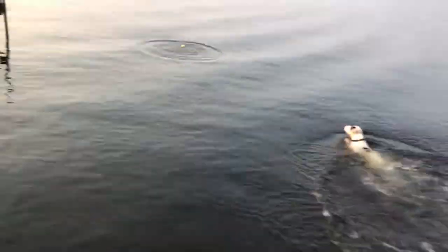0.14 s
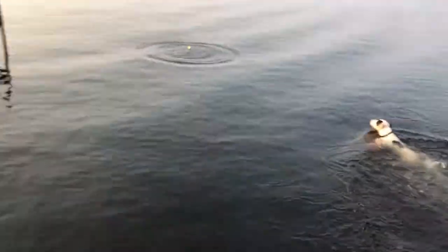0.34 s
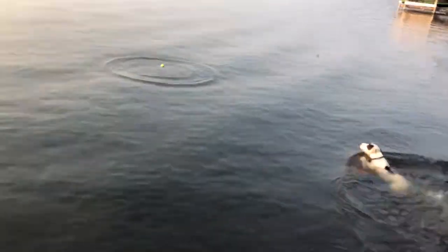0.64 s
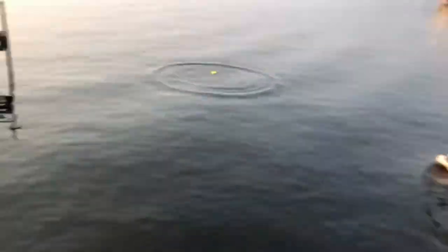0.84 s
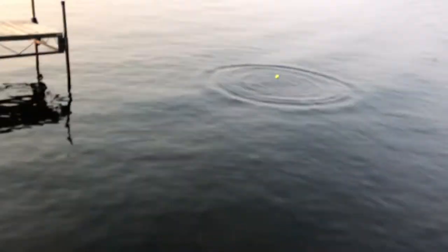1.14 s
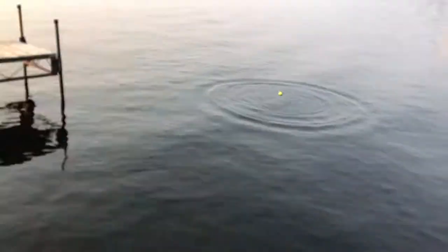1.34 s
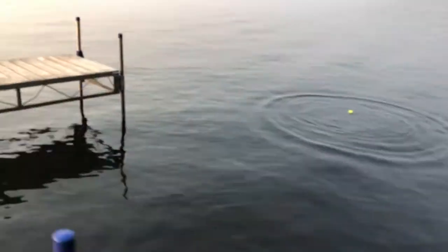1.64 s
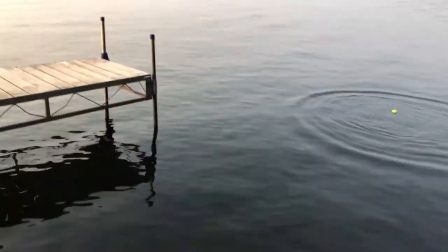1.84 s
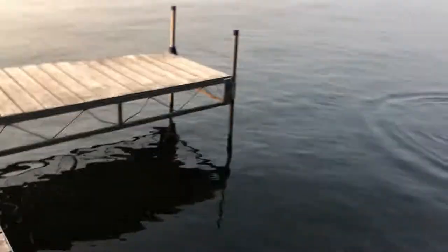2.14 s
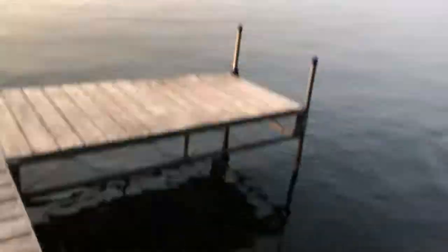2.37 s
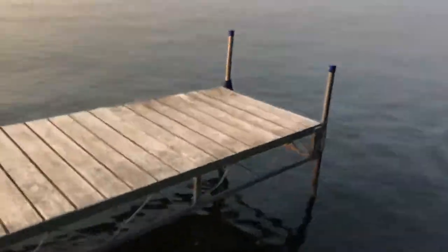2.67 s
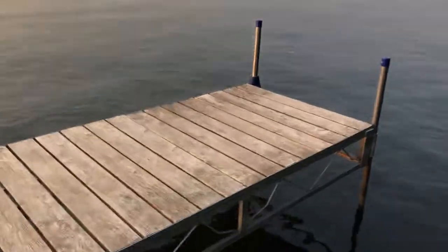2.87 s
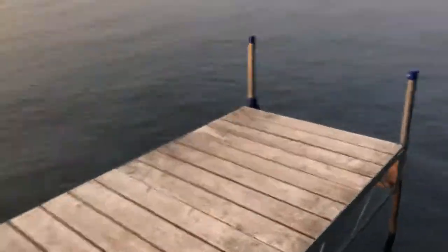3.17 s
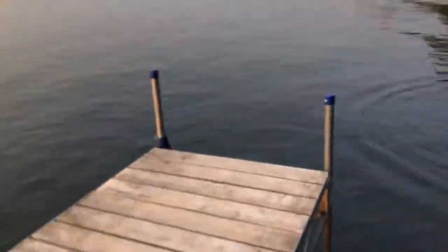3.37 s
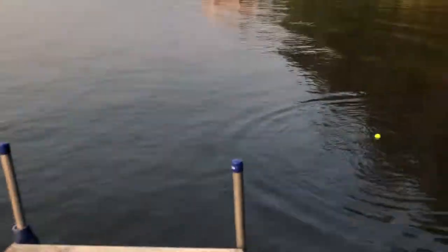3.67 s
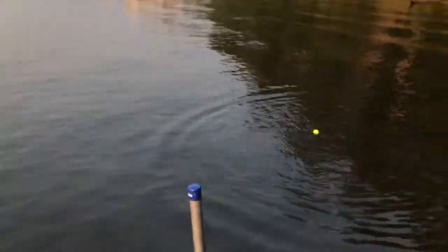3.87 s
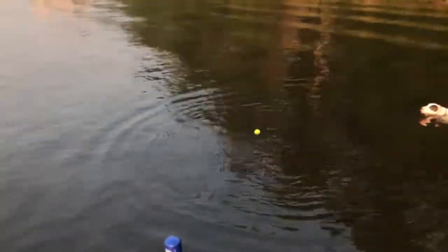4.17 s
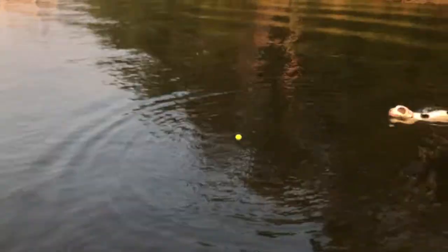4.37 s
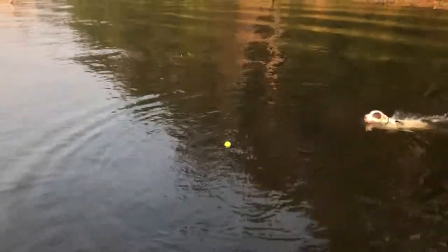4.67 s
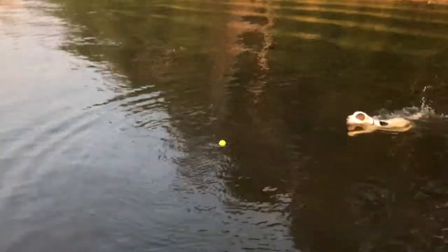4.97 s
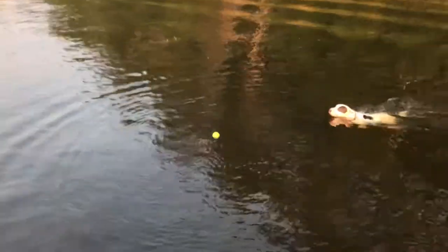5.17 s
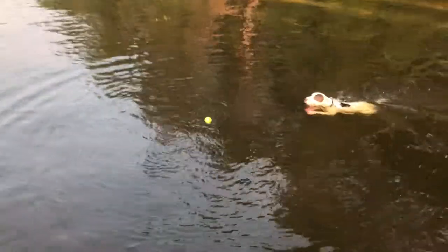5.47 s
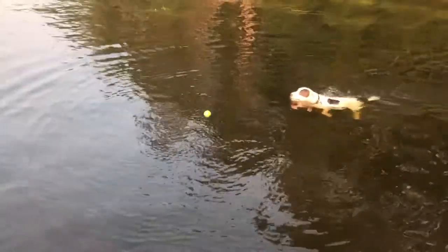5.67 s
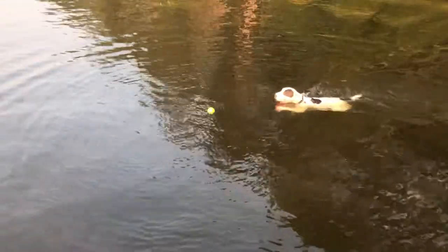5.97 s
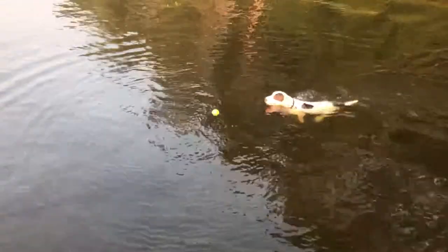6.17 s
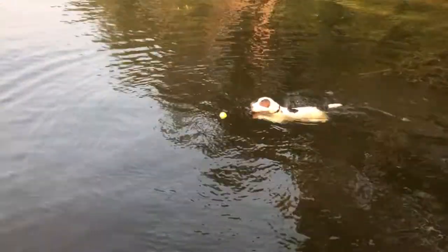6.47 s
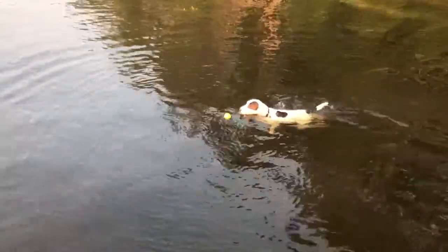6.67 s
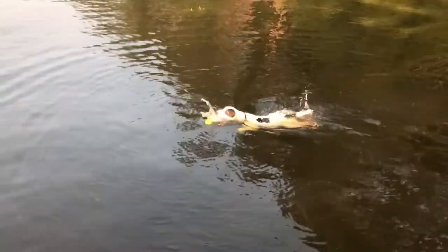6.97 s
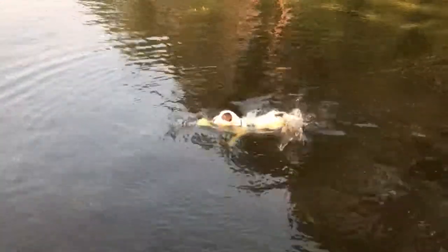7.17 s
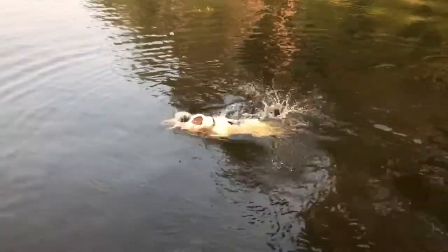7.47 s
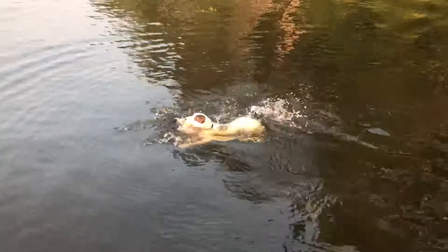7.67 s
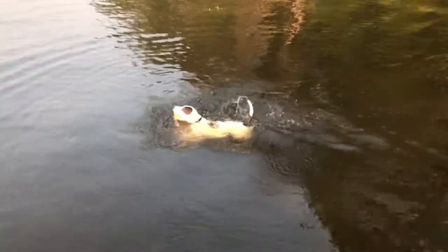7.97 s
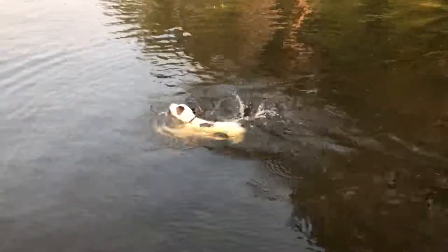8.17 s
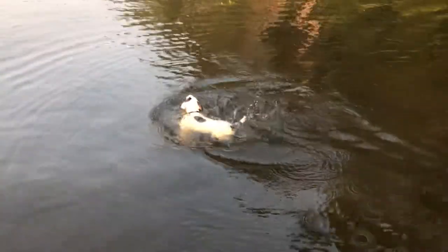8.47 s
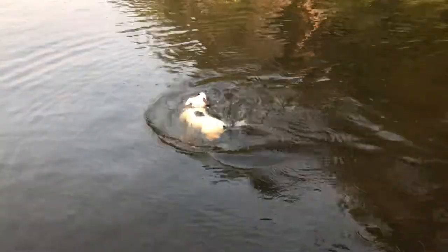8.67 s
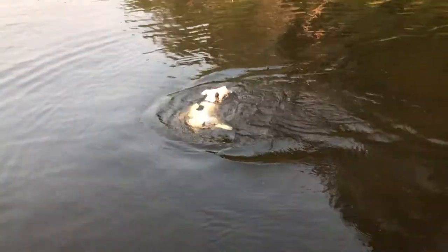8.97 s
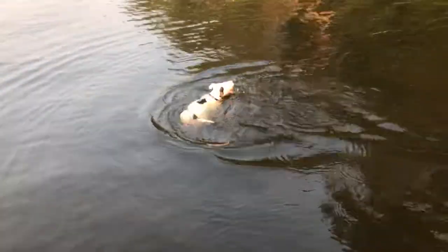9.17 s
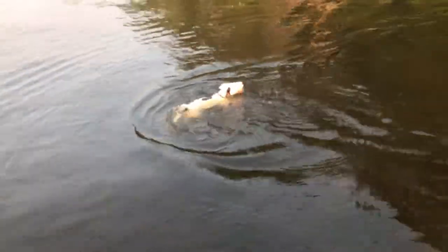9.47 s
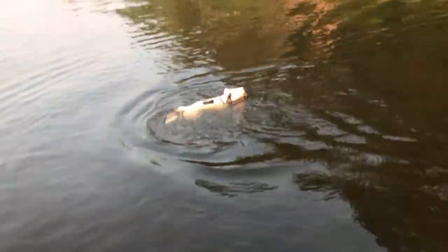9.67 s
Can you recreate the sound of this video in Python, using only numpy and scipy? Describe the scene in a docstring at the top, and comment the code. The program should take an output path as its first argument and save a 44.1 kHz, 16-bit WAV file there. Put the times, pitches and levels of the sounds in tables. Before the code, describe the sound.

Open lakeside, close handheld microphone. From 0 to about 3.8 seconds someone jogs on a plank dock, roughly three steps a second: hard, hollow wooden knocks with slaps, double hits and loose-board chatter, over a low rumble that keeps shaking between steps. A short rising squeak comes near 1.4, sharp ticks near 1.55, and an especially strong crack at 2.8. Steps weaken, with a lighter knock at 4.2 and a faint last one at 5.3. Underneath lie a soft, low lake hush and a faint distant motor hum. From 4.3 a dog's paddling emerges: a small splash at 4.4, a plop at 4.9, a soft swash at 5.8. At 6.8 to 7.7 comes the liveliest splashing, bubbly and bright with crisp spray, sharpest around 7.5. It thins to drips and light flicks by 8.2, then gentle gurgles and quiet strokes until the end near 9.8.

```python
"""On a quiet lake, someone jogs along a plank dock, which knocks, rattles and rumbles, then stands still.
Knocks are filtered noise with ringing modes; the shaken dock is swells of coloured noise and small rings.
A dog swims nearby: wash and spray are lumpy noise, bubbles and drops are damped sines or short clicks.
A far motor, a fuzzy low tone with a cleaner one about an octave up, hums over the hush of the lake."""
import sys
import numpy as np
from scipy import signal
from scipy.fft import rfft, irfft, next_fast_len
from scipy.io import wavfile
from scipy.ndimage import map_coordinates

SR = 44100
rng = np.random.default_rng(int(sys.argv[2]) if len(sys.argv) > 2 else 0)


def put_to_file(sound):
    """Save the sound as 16-bit audio at rate SR, in the file named by the first command-line argument."""
    columns = np.atleast_2d(sound).T  # one column per channel
    safe = np.clip(columns, -1, 1)
    whole_steps = np.round(safe * 32767)
    wavfile.write(sys.argv[1], SR, whole_steps.astype(np.int16))


N = 433503

# Resonances of the planks. Each row: centre in Hz, width in Hz, level in dB.
PLANK_MODES = [(91, 74, -2), (235, 51.7, 3.5), (368, 57, 3.5), (625.5, 56, -1.5), (857, 220, -13)]
# Spectrum of spray and hiss. Each row: frequency in Hz, relative density in dB per Hz.
SPRAY_SPECTRUM = [(1760, -5), (3000, -2.5), (4540, -8), (6620, -6.5), (13200, -10), (16000, -15)]
# Footfalls that set the whole dock shaking. Each row: start in seconds, rumble t60 in seconds,
# rumble level in dB, rattle level in dB, hiss level in dB, note of the board underfoot in Hz.
FOOTFALLS = [(-0.05, 1.56, -34.5, -47, -72.5, 194), (0.387, 2.3, -34, -54, -61, 172),
             (0.744, 0.91, -30.5, -48, -63, 186), (1.09, 1.4, -31, -45, -57, 183),
             (1.4, 0.94, -33, -45, -55, 121), (1.784, 1.7, -37, -53.5, -63, 150),
             (2.042, 1.03, -36.5, -53, -51, 178), (2.44, 2.4, -37, -50.5, -65, 175),
             (2.819, 1.47, -29.5, -43, -50, 143), (3.13, 2.58, -38.5, -51.5, -60.5, 183),
             (3.245, 0.76, -35.5, -62, -74, 140), (3.659, 1.08, -38, -47.5, -67, 153),
             (4.079, 1.24, -48, -54.5, -65, 159), (4.191, 1.1, -44.5, -55.5, -60.5, 159),
             (4.659, 1.34, -49.5, -60, -80, 178), (5.271, 0.41, -57, -68.5, -63, 125)]


def amp(db):
    """Decibel law: amplitude gain is ten to the power of level over 20."""
    return 10 ** (np.asarray(db) / 20)


def unit(x):
    """Normalisation by signal power: x scaled to rms 1."""
    return x / np.sqrt(np.mean(x ** 2) + 1e-20)


def along(points, hz):
    """Interpolation on a logarithmic frequency axis through (Hz, value) points."""
    f, v = np.transpose(points)
    return np.interp(np.log(hz + 1), np.log(f + 1), v)


def gains(rows):
    """Envelopes linear in dB: one gain per sample for each dB column, -120 dB outside the table."""
    seconds, *columns_db = np.vstack(rows).T
    t = np.arange(N) / SR
    return [amp(np.interp(t, seconds, db, -120, -120)) for db in columns_db]


def wobble(rate):
    """Slow random modulation: a smooth curve through random knots, rate of them a second."""
    knots = rng.standard_normal(int(N * rate / SR) + 4)
    return map_coordinates(knots, [np.arange(N) * rate / SR])


def filtered(x, response):
    """Linear filtering: the spectrum of x times a complex response of frequency."""
    m = next_fast_len(len(x) + 8192)
    return irfft(rfft(x, m) * response(np.fft.rfftfreq(m, 1 / SR)), m)[:len(x)]


def grains(s, gain, hz, cycles, rise):
    """Damped oscillation: soft-started sines whose pitch climbs by the share rise over a life in cycles."""
    rows = np.column_stack(np.broadcast_arrays(s, gain, hz, np.clip(cycles, .3, 60), rise))
    out = np.zeros(N + SR)
    by_length = rows[np.argsort(rows[:, 3] / rows[:, 2])]
    # grains of similar length are computed together
    for group in np.array_split(by_length, min(6, len(rows))):
        s, gain, hz, cycles, rise = group.T[:, :, None]
        t = np.arange(int(3.5 * SR * np.max(cycles / hz)))[None] / SR
        age = t * hz / cycles  # in lives
        turns = hz * t * (1 + rise * (age - 1) / 2)  # the given pitch is reached halfway through the life
        envelope = np.exp(-age - age ** 2 / 7) * (1 - np.exp(-8 * age))
        wave = gain * np.sin(2 * np.pi * turns) * envelope
        at = (s * SR).astype(int) + np.arange(t.size)
        out += np.bincount(at.ravel(), wave.ravel(), N + SR)
    return out[:N]


def scatter(level, count, low_hz, span, cycles, spread_db, rise):
    """Superposition of small random rings whose size follows a level curve."""
    draw = rng.random((count, 4))
    sounding = np.flatnonzero(level > 1e-5)
    at = sounding[(draw[:, 0] * len(sounding)).astype(int)]
    size = level[at] * amp(spread_db * draw[:, 1] ** 2)
    pitch_hz = low_hz * span ** draw[:, 2]
    return grains(at / SR, size, pitch_hz, cycles * (0.5 + draw[:, 3]), rise)


def bursts(peak_s, db, rise_s, t60_s):
    """Addition of powers: overlapping swells each rise smoothly to a peak, then decay exponentially."""
    # the gain is computed every 64 samples
    t = np.arange(0, N + 64, 64) / SR - np.reshape(peak_s, (-1, 1))
    rise_s, t60_s, db = (np.reshape(v, (-1, 1)) for v in (rise_s, t60_s, db))
    rising = np.sin(np.pi / 2 * np.clip(1 + t / rise_s, 0, 1)) ** 2
    power = (rising * amp(db - 60 * np.maximum(t, 0) / t60_s)) ** 2
    return np.interp(np.arange(N) / 64, np.arange(t.shape[1]), np.sqrt(power.sum(0)))


def rush(spectrum, lumpy_db, lump_hz, spike):
    """Shaped noise of rms 1: random lumps and sparse spikes, coloured by a spectrum."""
    spikes = rng.standard_normal(N) * rng.exponential(size=N) ** spike
    lumps = amp(lumpy_db * wobble(lump_hz))
    return unit(filtered(spikes * lumps, lambda hz: amp(along(spectrum, hz))))


def planks(f, modes):
    """Modal response: a sum of damped resonances of boards, alternating in sign."""
    total = 0
    for k, (centre, width, db) in enumerate(sorted(modes)):
        damping = 1j * f * width
        total = total + (-1) ** k * amp(db) * damping / (centre * centre - f * f + damping)
    return total


def underfoot(s):
    """Local resonance: note in Hz of the board that the last footfall landed on."""
    start, *_, note_hz = np.transpose(FOOTFALLS)
    return note_hz[np.clip(np.searchsorted(start - .02, s) - 1, 0, None)]


def lake_hush():
    """Broadband ambient noise: a soft spectrum under a slowly changing level."""
    # Each row: frequency in Hz, relative density in dB per Hz.
    quiet_spectrum = [(15, -69), (30, 8), (55, 1), (137, 2), (190, -2.5), (293, -8.5), (575, -13.5),
                      (734, -12.5), (1040, -15), (3080, -22.5), (3520, -22.5), (14800, -40), (16000, -38)]
    # Each row: time in seconds, level in dB.
    hush_levels = [(0, -50.5), (3.3, -55), (3.58, -56), (3.75, -52.5), (5, -53.5), (5.95, -54),
                   (6.5, -55.5), (9.83, -53.5)]
    return gains(hush_levels)[0] * rush(quiet_spectrum, lumpy_db=2.5, lump_hz=6, spike=0.31)


def far_motor():
    """Narrow-band noise and frequency modulation: a fuzzy low tone and a wavering one about an octave up."""
    # The second tone comes and goes. Each row: time in seconds, level in dB.
    overtone_levels = [(0, -47), (5.3, -63), (5.5, -58), (6.6, -61.5), (6.8, -72), (8.0, -79), (8.2, -56.5),
                       (8.7, -61.5), (9.83, -59)]
    motor_hz, motor_db = 66.9, -58.5
    noise = rng.standard_normal(N)
    fuzzy = unit(filtered(noise, lambda f: 1 / (1 + ((f - motor_hz) / 5) ** 2)))
    overtone_hz = 2.05 * motor_hz + 1.12 * wobble(3)
    clean = unit(np.sin(2 * np.pi * np.cumsum(overtone_hz) / SR)) * amp(0.25 * wobble(3.1))
    return amp(motor_db) * fuzzy + gains(overtone_levels)[0] * clean


def water():
    """Addition of powers: gains of gurgle, wash and spray join unsteady churning and single splashes."""
    # How hard the dog churns the water. Each row: time in seconds, gurgle, wash and spray levels in dB.
    churn_levels = [(4.3, -61, -72, -75), (4.8, -58, -54, -58), (4.97, -59, -64, -66), (5.3, -57, -61, -66),
                    (5.55, -60.5, -59, -62), (5.95, -68, -79, -75), (6.2, -57, -62, -64),
                    (6.45, -59.5, -59.5, -68), (6.78, -61, -65, -68), (7.02, -59, -60, -66),
                    (7.1, -49.5, -54.5, -55), (7.25, -49, -49.5, -51.5), (7.4, -51.5, -53, -55),
                    (7.62, -49, -53, -52.5), (7.92, -57, -52, -54.5), (8.1, -63, -62, -64.5),
                    (8.5, -59, -61.5, -63.5), (8.88, -55, -55.5, -66), (9.15, -61, -67.5, -65),
                    (9.83, -59.5, -62, -77)]
    # Single splashes. Each row: gurgle peak in seconds, swell in seconds, fall t60 in seconds,
    # gurgle, wash and spray levels in dB.
    splashes = [(4.374, 0.051, 0.32, -46.5, -46, -47.5), (4.45, 0.048, 0.15, -54, -50, -50.5),
                (4.892, 0.0079, 0.056, -53, -44.5, -61), (5.684, 0.13, 0.11, -53.5, -61, -66),
                (5.786, 0.091, 0.29, -46, -43.5, -51.5), (5.846, 0.034, 0.18, -50, -46.5, -57),
                (6.06, 0.025, 0.2, -51.5, -62, -76), (6.827, 0.026, 0.052, -43, -43.5, -47),
                (6.9, 0.03, 0.32, -48.5, -49, -46.5), (7.469, 0.0089, 0.56, -49.5, -48, -45.5),
                (7.585, 0.008, 0.04, -45, -40.5, -43), (8.16, 0.038, 0.32, -67, -72, -52.5),
                (8.86, 0.45, 1.2, -56.5, -58.5, -67), (9.4, 0.018, 0.059, -52, -58, -61)]
    lags = (0, 0.18, 0.19)  # brighter layers peak later, in shares of the swell
    s, swell_s, t60_s, *layers_db = np.transpose(splashes)
    unsteady = amp(1.17 * wobble(30))
    return [np.hypot(churn * unsteady, bursts(s + lag * swell_s, db, swell_s, t60_s))
            for churn, db, lag in zip(gains(churn_levels), layers_db, lags)]


def paddling():
    """Turbulent noise and resonant air: gurgle, wash and spray, with bubbles or droplets in proportion."""
    # Both tables, each row: frequency in Hz, relative density in dB per Hz.
    gurgle_spectrum = [(150, -21), (300, 5), (600, -0.5), (1000, -10), (1600, -4), (3000, -51)]
    wash_spectrum = [(500, -7), (1000, -3), (1500, 6), (3000, -1.5), (5000, -4.5), (7500, -9), (12000, -73)]
    gurgle, wash, spray = water()
    low = .5 * gurgle * rush(gurgle_spectrum, lumpy_db=1.5, lump_hz=60, spike=.3)
    low += scatter(gurgle, count=700, low_hz=380, span=3, cycles=3.5, spread_db=9, rise=.15)
    low += .7 * scatter(gurgle, count=1100, low_hz=500, span=4, cycles=7, spread_db=10, rise=.2)
    mid = .66 * wash * rush(wash_spectrum, lumpy_db=2, lump_hz=110, spike=.5)
    mid += 1.1 * scatter(wash, count=2200, low_hz=800, span=6, cycles=5.5, spread_db=10, rise=.15)
    droplets = 1.5 * scatter(spray, count=700, low_hz=3500, span=4, cycles=5, spread_db=12, rise=.1)
    fine_spray = .8 * spray * rush(SPRAY_SPECTRUM, lumpy_db=2, lump_hz=170, spike=.6)
    return low + mid + droplets + fine_spray


def bubbles():
    """Resonance of trapped air: its pitch rises near the surface, and choppy water makes it flutter."""
    # Plops, large bubbles and rising pockets of air. Each row: start in seconds, level in dB before
    # damping and flutter, mid-life pitch in Hz, life in cycles, rise of pitch over the life as a share.
    air_pockets = [(4.708, -36, 330, 5.6, 0), (5.301, -39, 597, 7.9, 0), (4.367, -28, 514, 3.3, 0),
                   (4.892, -30.5, 1044, 3.2, 0.2), (5.674, -43.5, 1340, 6.7, 0), (6.049, -44, 523, 5.6, 0),
                   (6.775, -41.5, 1490, 11, 0.7), (6.829, -40, 856, 11.3, 0.4),
                   (6.9, -31.5, 1900, 5.2, 0.04), (6.91, -25.5, 2370, 3.5, 0.86),
                   (6.933, -36, 1280, 6.3, 0.05), (6.979, -38.5, 1020, 4.7, 0.1), (7.002, -43, 624, 3.7, 0),
                   (7.03, -39, 1370, 5, 0.04), (7.055, -42, 2040, 6.1, 0.3), (7.074, -36, 372, 2.5, 0.1),
                   (7.087, -31.5, 583, 1.9, 0.7), (7.139, -38, 900, 3.3, 0), (7.166, -34, 1100, 8, 0.3),
                   (7.182, -28, 1460, 1.8, 0.5), (7.199, -30, 554, 2.1, 0.8), (7.231, -36, 1064, 4.2, 0.2),
                   (7.263, -34, 1360, 6, 0.2), (7.28, -36, 920, 4.3, 0.05), (7.379, -36, 1530, 3.7, 0.25),
                   (7.421, -35, 955, 3.8, 0.5), (7.47, -25.5, 2640, 5.3, 0.3), (7.516, -31, 365, 1.5, 0.1),
                   (7.584, -27.5, 829, 2.8, 0), (7.679, -38, 990, 9.7, 0.07), (7.903, -39, 1205, 8.4, 0.1),
                   (8.069, -48, 860, 6.2, 0.06), (8.163, -36.5, 2230, 5.8, 0.15), (8.3, -34, 456, 6.4, 0),
                   (8.299, -37, 890, 1.4, 0), (6.351, -36, 3730, 7.7, 0.36), (6.063, -46, 3000, 8.3, 0.1),
                   (1.992, -40.5, 3060, 7.3, 0), (8.968, -42, 477, 3.5, 0.13), (9.395, -46, 576, 6.7, 0.06),
                   (9.627, -44.5, 1540, 8, 0.4), (9.785, -45.5, 3450, 12, 0.25), (9.457, -45, 3440, 7, 0.1),
                   (4.816, -39.5, 1903, 11, 0.7), (4.815, -41, 1050, 4, 0.1), (6.943, -35.5, 180, 2.9, 0),
                   (7.59, -36, 175, 7.8, 0.2), (7.655, -47, 265, 7, 0.57), (7.7, -40.5, 532, 9.3, 0.25),
                   (7.724, -32, 966, 9, 0.46), (7.748, -42, 1655, 32, 0.04), (7.772, -43, 1790, 16, 0.03),
                   (7.477, -34, 1350, 4.2, 0.15), (8.477, -41, 1080, 7.1, 0.1),
                   (8.43, -50.5, 423, 35, 0.11), (8.444, -44, 2700, 10, 0.1), (7.17, -40, 298, 4.5, 0.2),
                   (8.611, -51, 2640, 8.1, 0.1), (8.641, -41.5, 3240, 9.9, 0.1),
                   (9.232, -42, 3660, 7.9, 0.1), (9.495, -46, 461, 15, 0.33), (9.646, -45.5, 1040, 11, 0)]
    s, db, hz, cycles, rise = np.transpose(air_pockets)
    return grains(s, amp(db), hz, cycles, rise) * amp(2.2 * wobble(180))


def ticks():
    """Impulse response: each burst of treble is a broad click with a brief ring at its centre."""
    # Drops and sharp ticks. Each row: start in seconds, peak in dB before a 5 dB cut, centre in Hz.
    clicks = [(0.0747, -38, 4220), (0.7376, -23, 11500), (1.189, -30.5, 4370), (1.264, -35, 8670),
              (1.4542, -38, 4220), (1.5534, -17.5, 6260), (1.6677, -40, 3200), (0.5288, -33.5, 1800),
              (1.594, -30.5, 4094), (1.6906, -39, 9620), (1.712, -33, 9300), (1.79, -23, 9500),
              (1.852, -33, 4170), (1.964, -35, 4355), (2.0793, -42, 7540), (2.126, -28, 5130),
              (2.419, -39, 4200), (2.61, -30, 4180), (2.6503, -34.5, 4075), (2.6799, -37, 4520),
              (2.7144, -34.5, 7790), (2.8197, -22, 4200), (3.13, -35.5, 5020), (3.246, -30, 5570),
              (3.3366, -33.5, 4230), (3.701, -35, 4880), (3.892, -39, 4210), (4.243, -40, 4510),
              (4.275, -31.5, 4300), (4.346, -36, 6540), (4.037, -41, 3980), (4.114, -45, 8800),
              (5.329, -39, 6940), (5.375, -40, 5500), (5.503, -41, 6540), (5.898, -43, 8000),
              (4.725, -35.5, 4140), (4.891, -28.5, 4570), (6.057, -38, 5070), (6.8228, -21.5, 6700),
              (6.9, -29, 4600), (7.038, -37, 11120), (7.129, -34, 5490), (7.157, -34, 6020),
              (7.217, -32, 5330), (7.28, -26, 5106), (7.3267, -37, 5240), (7.4057, -34, 5560),
              (7.469, -19, 6040), (7.504, -30, 5820), (7.5854, -38, 6510), (7.6166, -37, 4020),
              (7.777, -31, 4000), (7.8007, -38, 4280), (8.003, -35, 4370), (8.118, -29.5, 4500),
              (8.162, -27, 5340), (8.1853, -35, 5290), (8.2796, -38, 6230), (8.301, -30.5, 6650),
              (8.445, -41, 6120), (8.6517, -40, 5250)]
    out, t = np.zeros(N + SR), np.arange(SR // 30) / SR
    for s, db, centre_hz in clicks:
        def tone(f):
            ratio = f / centre_hz
            treble = ratio ** 2 / (0.044 + ratio ** 2)
            return treble * (0.38 + 1 / (1 + ((f - centre_hz) / (0.21 * centre_hz)) ** 2))

        burst = rng.standard_normal(len(t)) * amp(-60 * t / 0.011) * (1 - np.exp(-t / 0.00069))
        burst = filtered(burst, tone)
        out[round(s * SR):][:len(t)] += amp(db - 5.0) * burst / np.abs(burst).max()
    return out[:N]


def faint_drops():
    """Random superposition: faint drops fall at random, the higher ones ringing for fewer cycles."""
    when, size, height = rng.random((520, 3)).T
    pitch_hz = 2500 * 6 ** height
    return grains(9.8 * when, amp(-53 + 9 * size ** 3), pitch_hz, 2 + 5 * (1 - height) ** 2, rise=.1)


def squeak():
    """Damped oscillation of one dock board, with an uneven level."""
    # Start in seconds, level in dB before damping, mid-life pitch in Hz, life in cycles, rise as a share.
    squeaking_board = (1.374, -38, 1150, 28, 0.4)
    s, db, hz, cycles, rise = squeaking_board
    return grains(s, amp(db), hz, cycles, rise) * amp(2 * wobble(200))


def shaken_boards(rumble):
    """Forced vibration: shaking excites the plank resonances and the note of the board underfoot."""
    boards_db, note_db = -7, -10.5  # over the rumble
    shaking = rush([(20, 0)], lumpy_db=6, lump_hz=35.57, spike=0.3)
    ringing = unit(filtered(shaking, lambda f: planks(f, PLANK_MODES)))
    note_hz = underfoot(np.arange(N) / SR)
    note = np.sin(2 * np.pi * np.cumsum(note_hz) / SR) * (0.7 + wobble(24.94))
    return rumble * (amp(boards_db) * ringing + amp(note_db) * unit(note))


def deck():
    """Free decay: the whole dock keeps shaking after each step, and loose boards clatter."""
    # Both tables, each row: frequency in Hz, relative density in dB per Hz.
    rumble_spectrum = [(18, -49), (30, -55), (49, -1.5), (91, 1.5), (173, -1.5), (563, -14), (759, -76),
                       (900, -19), (1170, -58), (1980, -120)]
    rattle_spectrum = [(290, 20), (500, -6), (758, -1), (1440, -8), (1550, 5.5), (6000, -4.5), (7800, -63),
                       (13200, -120)]
    # Spray of the dog's wake dying away. Each row: time in seconds, level in dB.
    wake_levels = [(0, -54), (0.5, -63.5), (1.6, -64.5), (2.3, -76)]
    rise_s = 0.051  # the shaking builds after the foot lands
    rattle_lasts, hiss_lasts = 0.99, 0.46  # in shares of the rumble's t60
    s, t60_s, rumble_db, rattle_db, hiss_db, _ = np.transpose(FOOTFALLS)
    rumble = bursts(s + rise_s, rumble_db, rise_s, t60_s)
    rattle = bursts(s + rise_s, rattle_db, rise_s, rattle_lasts * t60_s)
    step_hiss = bursts(s + rise_s, hiss_db, rise_s, hiss_lasts * t60_s)
    hiss = np.hypot(step_hiss, gains(wake_levels)[0])
    low = rumble * rush(rumble_spectrum, lumpy_db=2.5, lump_hz=30, spike=.2)
    mid = .68 * rattle * rush(rattle_spectrum, lumpy_db=2.5, lump_hz=70, spike=.5)
    mid *= amp(2.5 * wobble(28))
    clatter = 1.25 * scatter(rattle, count=2400, low_hz=420, span=5, cycles=5, spread_db=9.5, rise=0)
    high = hiss * rush(SPRAY_SPECTRUM, lumpy_db=2, lump_hz=150, spike=.7)
    return low + shaken_boards(rumble) + mid + clatter + high


def early(x):
    """Normalisation by onset energy: the first 25 ms set the strength of a blow."""
    return x / np.linalg.norm(x[:SR // 40]) * 10


def blow_colour(hz, spectrum, bright_db, spot_hz):
    """Contact spectrum in dB: dull blows lose treble and middle, and the struck spot stands out."""
    spot_db, spot_octaves = 6, .11  # how much and how narrowly the struck spot rings
    colour_db = along(spectrum, hz) + (bright_db + 30) * np.clip(np.log2((hz + 1) / 2500), 0, 1)
    colour_db += 0.22 * (bright_db + 20) * np.clip(np.log2((hz + 1) / 900), 0, 1.5)
    colour_db += spot_db * np.exp(-(np.log2((hz + 1) / spot_hz) / spot_octaves) ** 2 / 2)
    # uneven overtones
    colour_db += 2.5 * map_coordinates(rng.standard_normal(40), [np.log2(hz + 150) * 4])
    return colour_db


def thud_of(s, t):
    """Forced resonance: the foot loads the board for a few hundredths of a second."""
    board_width_hz, board_db = 29.8, 11
    shove = rng.standard_normal(len(t)) * amp(-60 * t / 0.14) * (1 - np.exp(-t / 0.00034))
    modes = PLANK_MODES + [(underfoot(s), board_width_hz, board_db)]
    return filtered(shove, lambda f: planks(f, modes))


def knocks():
    """Frequency-dependent damping: each blow is a slap that dies treble first, and a thud through boards."""
    # Heels, soles and loose planks. Each row: start in seconds, slap level in dB before a 3.5 dB cut,
    # thud over slap in dB before the trims, brightness in dB, ring of the struck spot in Hz.
    blows = [(0.028, -18.5, -5, -47, 452), (0.071, -21.5, -2.5, -10, 673), (0.353, -47, 17, -6, 510),
             (0.384, -10, -7, -6.5, 2387), (0.468, -30.5, -0.5, -16, 454), (0.554, -37, 7.5, -29, 447),
             (0.582, -28.5, -32, -35, 1180), (0.695, -47, 16, -13, 464), (0.723, -28.5, -7, -29, 715),
             (0.74, -21, 1.5, -8, 710), (0.75, -15.5, -25, -18, 614), (0.772, -25, -8, -13.5, 680),
             (0.839, -22.5, -4, -26, 696), (0.904, -44, 11, -15, 594), (1.051, -37, 7.5, -27, 452),
             (1.087, -14.5, -6, -46, 601), (1.1, -14, -12, -18, 637), (1.192, -24, -5.5, -34, 609),
             (1.414, -13, -14.5, -56, 645.5), (1.432, -16.5, -17, -18, 1676),
             (1.451, -16.5, -6, -11.5, 449.4), (1.746, -36.5, 6.5, -38, 590), (1.781, -21, -10, -45, 623),
             (1.789, -18.5, -6, -9, 1300), (1.806, -23, -2.5, -31, 600), (1.831, -19.5, -16, -39, 900),
             (2.039, -28, -7.5, -35, 651), (2.077, -32, -7, -23, 599), (2.113, -32.5, 4, -45, 445),
             (2.125, -30, -6, -15, 600), (2.419, -26, -6.5, -38, 604), (2.438, -17.5, -6, -37, 907),
             (2.476, -12.5, -11.5, -21, 589.5), (2.528, -18.5, -6, -17, 647), (2.57, -34.5, 7.5, -14, 2297),
             (2.716, -33.5, 4, -14, 454), (2.78, -41, 0, -35, 455), (2.821, -4.5, -28, -9, 870),
             (2.825, -15.5, -4.5, -18, 606), (2.885, -29, -2, -12.5, 461.5), (2.943, -33, -16, -5, 544),
             (3.125, -32.5, -1.5, -15, 2830), (3.136, -28, -1.5, -35, 1300), (3.313, -32, -8, -25, 2210),
             (3.245, -17.5, -9, -18, 500), (3.276, -20, -14, -22, 953), (3.337, -18, -11.5, -24, 513),
             (3.646, -30, -4, -50, 499), (3.66, -22.5, -7, -79, 442), (3.704, -40.5, 7, 1, 462),
             (3.744, -31, 0.5, -29, 714), (3.795, -27, -9, -19, 568), (4.187, -23, -9, -17, 720),
             (5.268, -41, 4, -11, 450)]
    # A sole on wood. Each row: frequency in Hz, relative density in dB per Hz.
    slap_spectrum = [(180, -6), (300, -3), (926, -1.5), (1940, -4.5), (2770, -10), (4680, -34),
                     (5630, -42.5), (6180, -39), (12000, -70), (15600, -78), (22000, -120)]
    # Reference decay, scaled for each stage below. Each row: frequency in Hz, t60 in seconds.
    decay_times = [(100, 0.21), (400, 0.23), (1500, 0.15), (6000, 0.04)]
    overtones_db, overtones_last = -5.5, 0.57  # over the slap; in shares of the reference t60
    out, t = np.zeros(N + SR), np.arange(SR // 3) / SR
    for s, db, thud_db, bright_db, spot_hz in blows:
        hz, frame_s, z = signal.stft(rng.standard_normal(len(t)), SR, nperseg=256)
        colour_db = blow_colour(hz, slap_spectrum, bright_db, spot_hz)
        t60 = along(decay_times, hz)[:, None]
        # a quick decay, then two slower and fainter ones
        fade = amp(-60 * frame_s / (0.11 * t60))
        fade = fade + 0.21 * amp(-60 * frame_s / (0.73 * t60))
        fade = fade + 0.071 * amp(-60 * frame_s / (3.14 * t60))
        slap = signal.istft(z * amp(colour_db)[:, None] * fade, SR, nperseg=256)[1][:len(t)]
        # the board's own overtones ring on, different in every blow
        height, turn, size = rng.random((3, 24, 1))
        mode_hz = 330 * 10 ** height
        mode_t60 = overtones_last * along(decay_times, mode_hz)
        level_db = np.interp(mode_hz, hz, colour_db) - 14 * size - 60 * t / mode_t60
        ring = np.sum(amp(level_db) * np.sin(2 * np.pi * (mode_hz * t + turn)), axis=0)
        slap = early(slap) + amp(overtones_db) * early(ring)
        # after the first crack the board chatters unevenly
        uneven = map_coordinates(rng.standard_normal(60), [t * 170])
        chatter = amp(2.5 * (1 - np.exp(-t / .025)) * uneven)
        slap = slap * chatter * (1 - np.exp(-t / 0.0011))
        thud = thud_of(s, t)
        blow = amp(db - 3.5) * early(slap) + amp(db + thud_db + 6.0) * early(thud)
        out[round(s * SR):][:len(t)] += blow
    return out[:N]


def scene():
    """Superposition of distance, dog and dock at one microphone."""
    distance = lake_hush() + far_motor()
    dog = paddling() + bubbles() + ticks() + faint_drops()
    dock = deck() + squeak() + knocks()
    return (distance + dog + dock)[None]


def record(dry):
    """Band limiting: the microphone cuts the deepest bass, and nothing is kept from 16 kHz up."""
    corner_hz, top_hz = 45, 16000

    def response(hz):
        bass_cut = (1j * hz / (1j * hz + corner_hz)) ** 3
        return bass_cut * (hz < top_hz)

    return filtered(dry[0], response)[None]


dry = scene()
out = record(dry)
put_to_file(out)
```